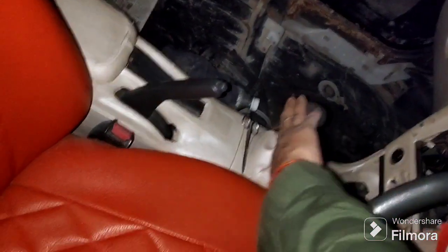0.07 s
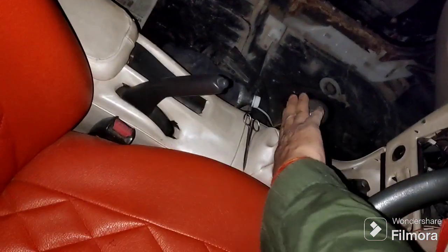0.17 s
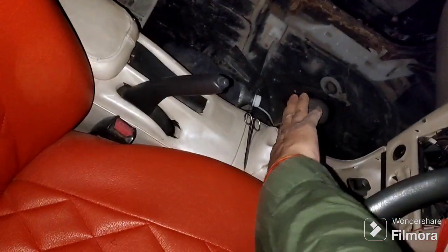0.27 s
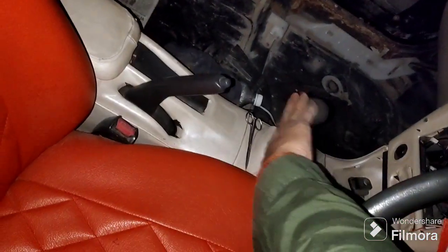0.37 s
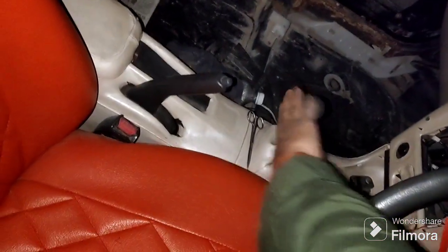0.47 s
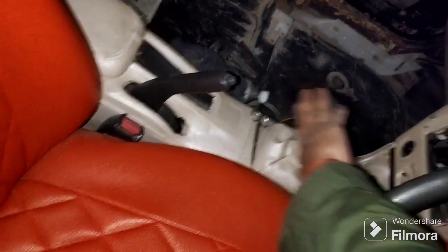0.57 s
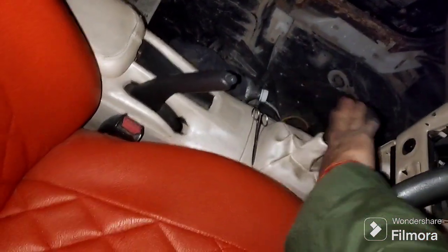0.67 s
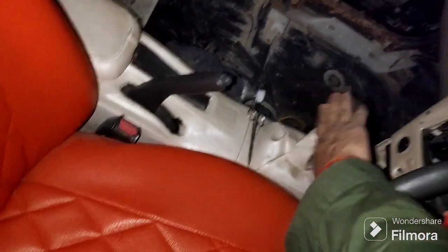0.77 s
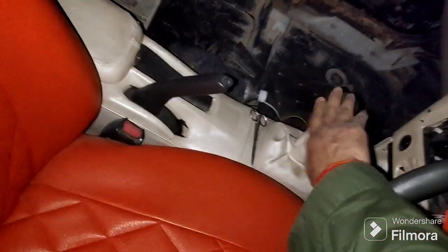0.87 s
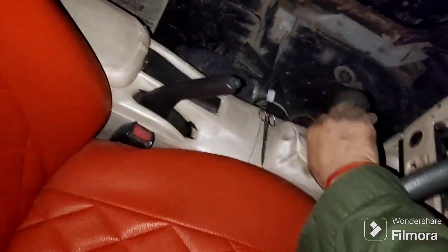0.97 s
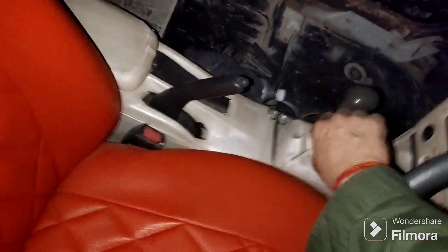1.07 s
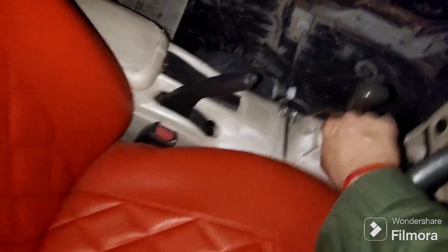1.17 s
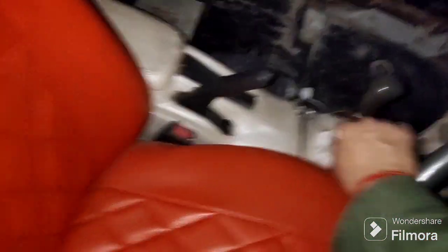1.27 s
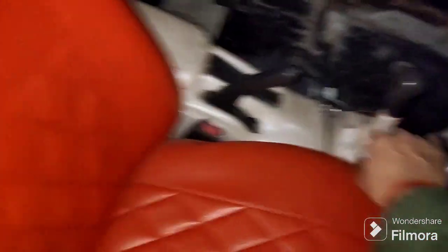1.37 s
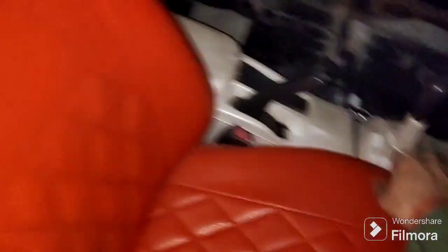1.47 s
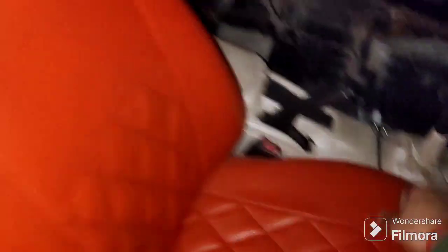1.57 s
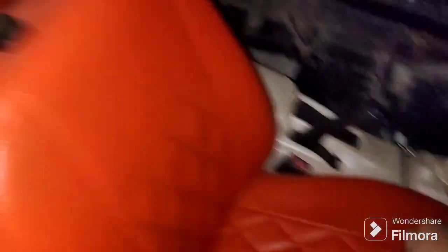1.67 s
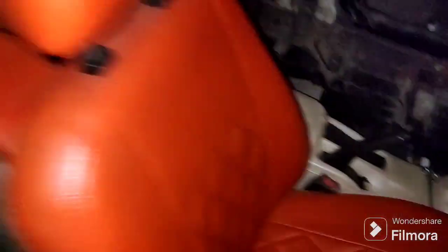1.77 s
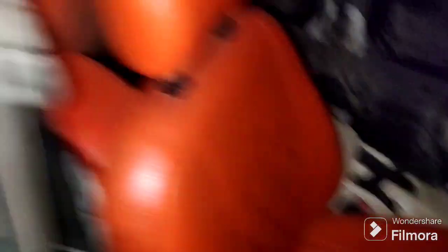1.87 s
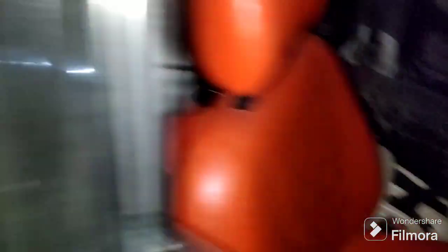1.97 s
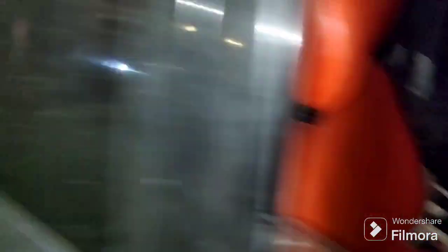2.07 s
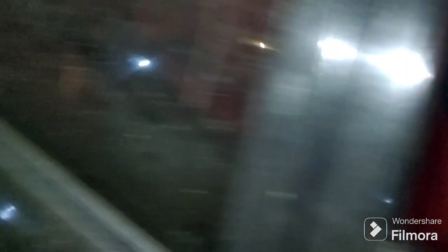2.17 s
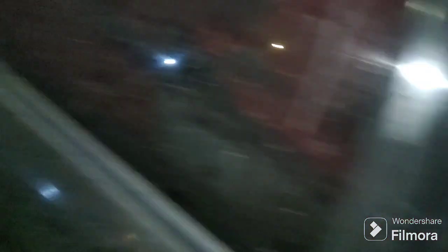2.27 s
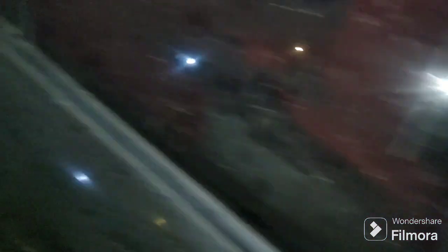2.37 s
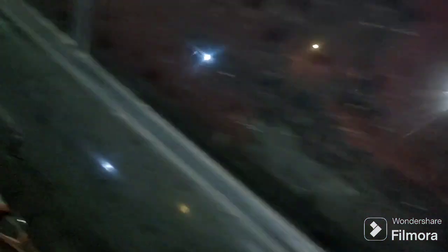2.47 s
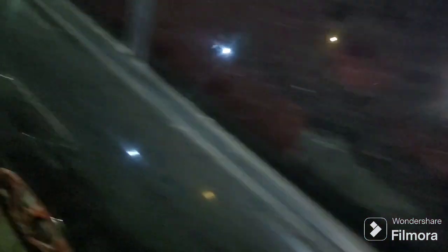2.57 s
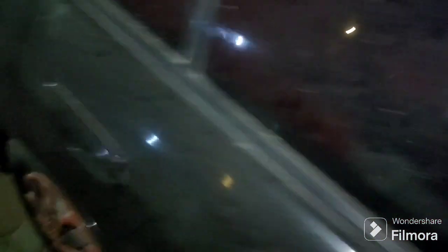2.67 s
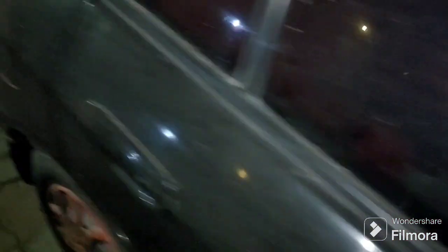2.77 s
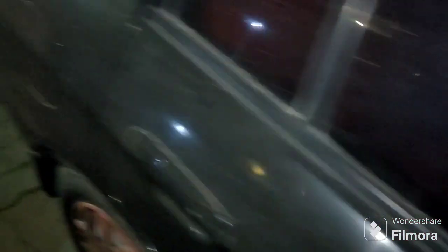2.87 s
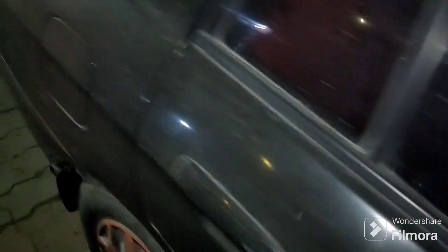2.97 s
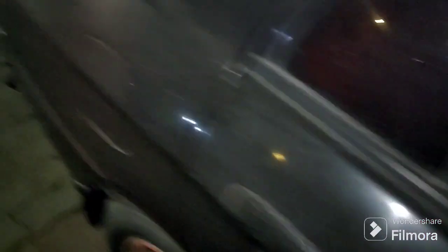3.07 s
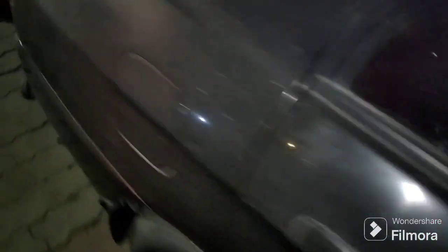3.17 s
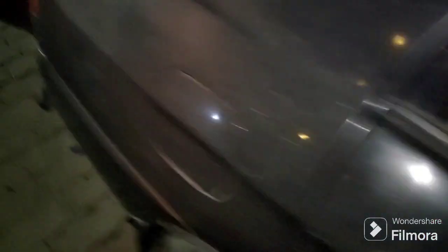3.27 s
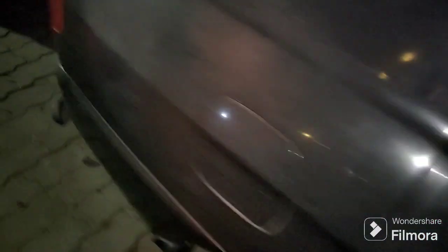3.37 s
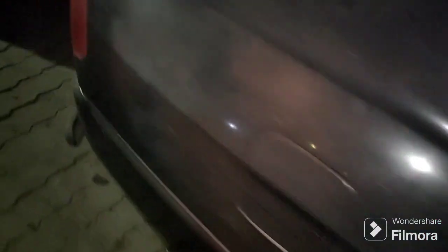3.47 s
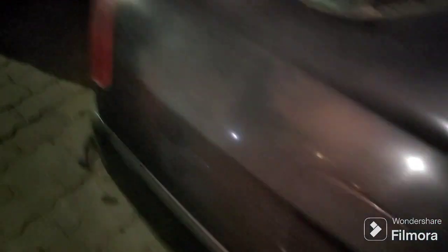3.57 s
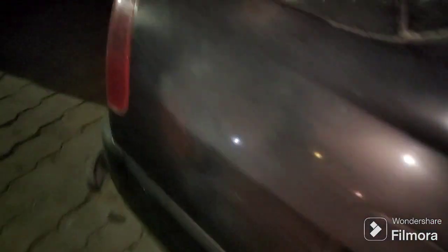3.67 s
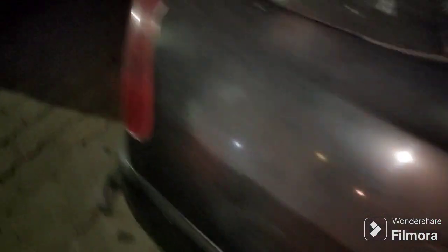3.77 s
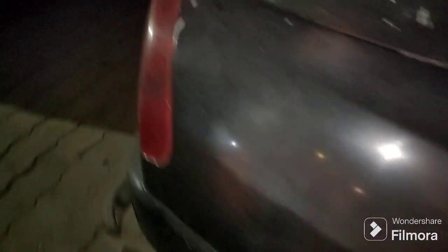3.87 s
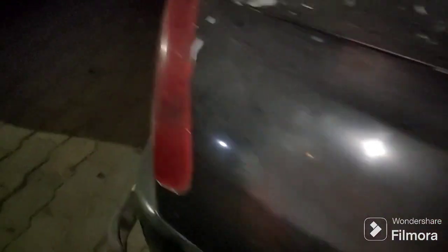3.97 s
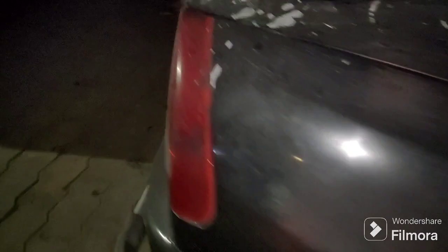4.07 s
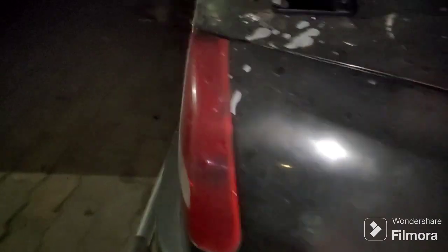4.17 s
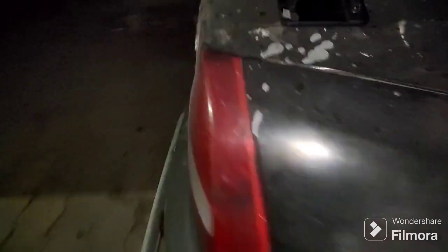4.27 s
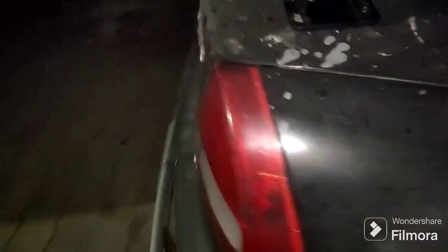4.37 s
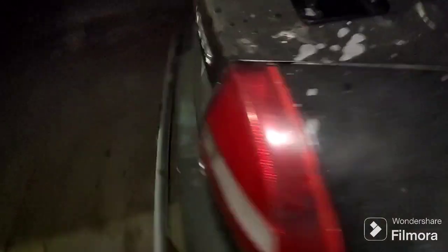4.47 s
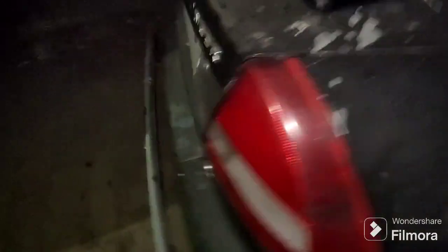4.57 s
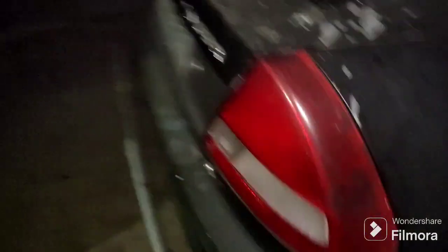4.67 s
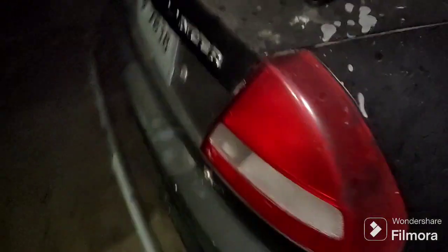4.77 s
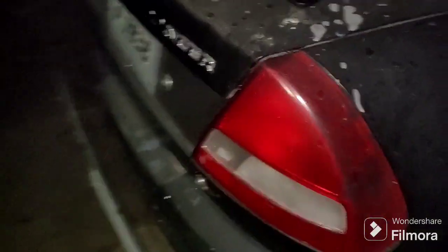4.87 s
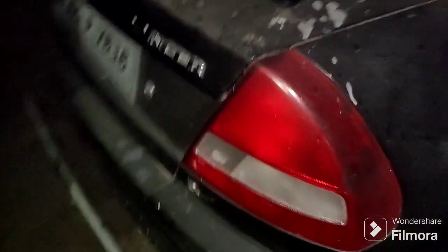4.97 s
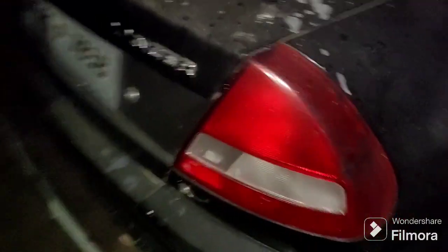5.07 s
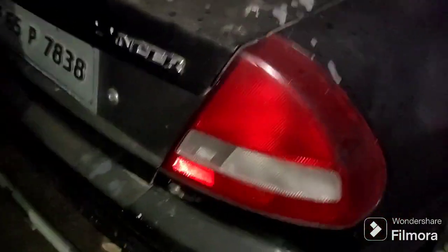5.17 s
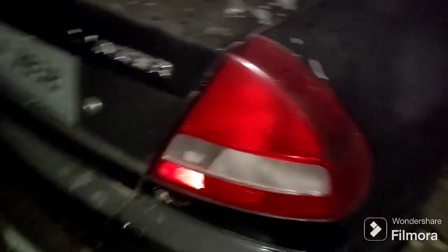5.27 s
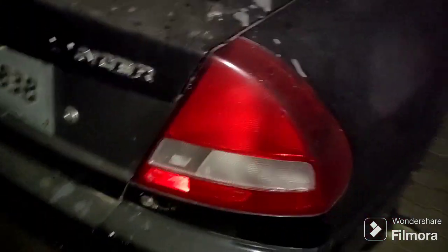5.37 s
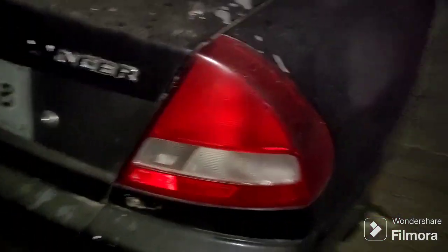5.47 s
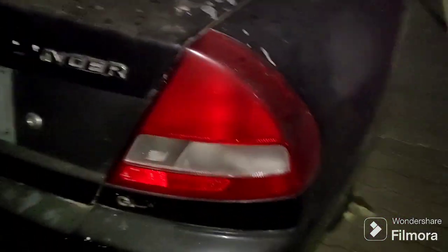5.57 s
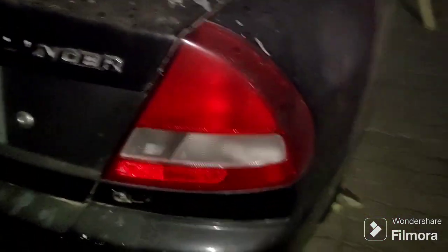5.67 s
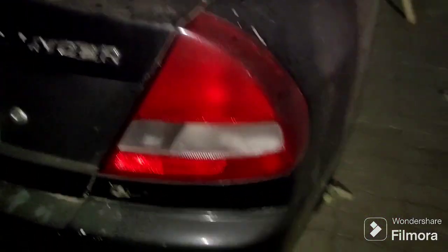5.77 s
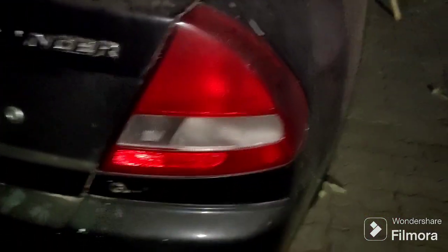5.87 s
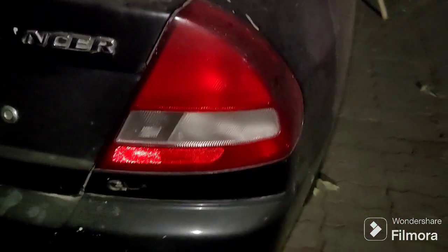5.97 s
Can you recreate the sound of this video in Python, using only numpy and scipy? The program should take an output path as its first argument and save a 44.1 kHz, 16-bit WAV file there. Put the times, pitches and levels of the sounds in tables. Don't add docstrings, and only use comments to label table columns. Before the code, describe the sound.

Soft lever thuds inside a hushed cabin open out to a bright latch click, gritty footsteps, cloth rustle and a faint droning, whining engine.

```python
import sys
import numpy as np
from scipy import signal
from scipy.fft import rfft, irfft, next_fast_len
from scipy.io import wavfile
from scipy.ndimage import uniform_filter1d

SR = 44100
rng = np.random.default_rng(int(sys.argv[2]) if len(sys.argv) > 2 else 0)


def field_ratio(decibels):
    return 10 ** (np.asarray(decibels, dtype=float) / 20)


def file_out(sig):
    cols = np.atleast_2d(sig).T
    lim = np.clip(cols, -1, 1)
    pcm = np.round(lim * 32767).astype(np.int16)
    wavfile.write(sys.argv[1], SR, pcm)


N = 265437

# time in seconds, peak in dB, console share in dB, ring t60 in seconds.
KNOCKS = [(0.002, -35.5, -14.5, 0.13), (0.62, -57, -20, 0.12), (0.645, -40.5, -42, 0.14),
          (0.664, -42.5, -53, 0.57), (0.771, -19.5, -12, 0.17), (0.789, -33, 5.5, 0.15),
          (0.808, -35, -2, 0.1), (0.842, -19, -5.5, 0.31), (0.882, -22.5, -16.5, 0.11),
          (0.942, -43, -7, 0.13), (0.982, -36, -12, 0.067), (1.03, -43.5, -14, 0.068),
          (1.1, -52.5, -29, 0.074), (1.654, -43, -11.5, 0.35), (1.68, -42, -20, 0.39),
          (1.761, -44, -43, 0.093), (0.44, -68, -25, 0.15)]
# frequency in Hz, level in dB, relative ring time.
CABIN_MODES = [(89, -1.5, 2.5), (114, -4.5, 1.6), (139.7, 1, 0.8), (161.3, -1.5, 1.0), (210, -3, 1.3)]
# frequency in Hz, level in dB, relative ring time.
CONSOLE_MODES = [(317.5, 4, 1), (468, -21, 0.46), (525, -0.5, 0.62), (679, -13, 1), (1024, -2, 0.21),
                 (1262, -3.5, 0.23), (1512, 0, 0.2)]
# time in seconds,
# peak, low share, top share and left minus right in dB.
TICKS = [(2.1847, -46, 1, -2, 3), (2.6554, -46.5, 0, -23, 1), (2.6783, -43, -3, -50, 0),
         (2.8747, -45.5, -5, -8.5, 8), (3.3447, -50, 12.5, -45, 17), (3.52, -40.5, -24, -11, 6),
         (3.5339, -38.5, 0, -9.5, 0.5), (3.8375, -35, -8, -16, 2), (4.0017, -46, 0, -13, 4),
         (4.119, -43.5, -4, -2.5, -2.5), (4.126, -38, 1, -12, 5), (4.6501, -49.5, 4, -22.5, -2),
         (4.7604, -42.5, 2, -7, 4), (5.226, -41, 0.5, -11, 6), (5.2421, -45, 0, -35, -11),
         (5.2578, -39.5, -10, -3, 1.5), (5.3657, -35.5, 3.5, -10.5, 2.5), (.196, -66, -6, -8, 0),
         (0.439, -73, -4, -2, 1), (5.1675, -40, -6, -7, -2), (5.268, -45, -12, -8, 0),
         (5.286, -46.5, -0.5, -8, 5), (4.04, -49, -6, -9, 2), (2.12, -56, -14, -4.5, -1),
         (3.855, -30, -13, -10, -1), (5.196, -48, -10, -8, 0), (4.713, -58.5, -10, 10, 2)]
# time in seconds, peak in dB, left minus right in dB.
SNAP = [
    (2.2112, -12, 7.5),
]
# frequency in Hz, level in dB, t60 in seconds.
LATCH_MODES = [(2406, -16.5, 0.078), (3450, -18, 0.085), (4430, -6.5, 0.0505), (4840, -1, 0.041),
               (6223, -2.5, 0.0566), (6730, -8, 0.053), (7250, -11.5, 0.097), (7600, -6.5, 0.082),
               (8856, -18.5, 0.1107), (9100, -22, 0.085), (9701, -15.5, 0.065), (10300, -11, 0.072),
               (10550, -11.5, 0.043), (11800, -11.5, 0.058)]
# frequency in Hz, level in dB per Hz.
LATCH_COLOUR = [(290, -58.5), (500, -24.5), (1060, -19.5), (2460, -11.5), (2810, -21), (3340, -10),
                (5470, -10), (6330, -1), (11000, -11.5), (12300, -8), (16000, -30.5)]
# frequency in Hz, left minus right in dB.
LATCH_LEAN = [(60, -13), (110, -5), (200, 2), (380, -7), (700, 19.5), (1290, -4), (2380, 8), (4400, 5.5),
              (8120, 9), (15000, -3)]
# time in seconds, peak, low share and top share in dB, rise in seconds.
SCUFFS = [
    (0.7784, -34.5, 4.5, -4, 0.0083),
    (0.8407, -43.5, 12, -18, 0.0021),
    (0.955, -50.5, 7.5, -8, 0.014),
    (3.4298, -43, 0, -8, 0.013),
    (3.838, -25, -9.5, -10, 0.018),
    (3.905, -32.5, -2, -8.5, 0.011),
    (4.5827, -48.5, 6.5, -8, 0.0057),
    (5.1188, -29.5, -0.5, -13, 0.022),
    (5.667, -38.5, -0.5, -8.5, 0.02),
    (5.9784, -43.5, 2, -11.5, 0.032),
]
# time of full force, swell and hold in seconds, level and top share in dB.
RUBS = [(0.879, .05, 0.11, -80.5, -18), (0.956, 0.06, 0.055, -75.5, 1.5), (1.301, 0.025, 0.07, -68.5, 6),
        (1.32, 0.22, 0.28, -84, 17.5), (1.716, .03, 0.059, -72, -2), (2.186, 0.15, 0.099, -61, -3),
        (2.277, 0.038, 0.089, -69.5, 1), (2.699, 0.11, 0, -76.5, 0), (2.76, 0.24, 0.042, -66, -1),
        (2.86, .04, 0.04, -70, -2.5), (3.364, 0.11, 0.084, -69.5, -6.5), (3.43, 0.22, 0.051, -67, -1),
        (3.573, .03, 0.046, -72.5, -5), (3.972, .06, 0.093, -63.5, -0.5), (4.108, 0.049, 0.15, -73.5, 3.5),
        (4.584, 0.0097, 0.049, -67, 2.5), (4.671, 0.05, 0.022, -60, 0), (4.81, .03, 0.013, -68.5, -8),
        (4.944, 0.33, 0.1, -83.5, 8), (5.19, 0.038, 0.017, -67.5, 4.5), (5.282, 0.091, 0.055, -59.5, -1),
        (5.416, 0.036, 0.013, -69.5, -2), (5.676, 0.0092, 0.04, -58.5, -3.5), (6.019, 0.017, 0, -69, 11)]
# frequency in Hz, level in dB per Hz.
RUB_TOP_COLOUR = [(7200, -31), (7600, 5), (8400, 8.5), (9300, 0), (10200, -3.5), (11200, -1), (12400, 1.5),
                  (13800, -11.5), (15400, -8.5)]
# time in seconds, peak in dB, resonance and width in Hz, t60 in seconds.
CREAKS = [(0, -66.5, 1590, 247, 0.33), (0, -73.5, 2740, 200, 0.28), (0.196, -68.5, 2580, 147.3, 0.092),
          (.197, -75, 3700, 200, 0.14), (0.199, -70, 5170, 840, 0.13), (.197, -74, 8160, 900, 0.11),
          (.197, -75, 12300, 1200, 0.1), (.27, -73.5, 7800, 900, 0.046), (.27, -77, 12300, 1500, 0.046),
          (.357, -77.5, 8340, 500, .12), (0.439, -67.5, 8600, 2610, 0.18), (.44, -87, 12300, 1533, 0.13),
          (0.639, -88, 1707, 200, 0.26), (1.281, -77, 1930, 300, 0.5), (1.281, -77.5, 2550, 247.3, .4),
          (0.945, -60.5, 1470, 500, 0.2), (1.048, -76.5, 8400, 503, 0.53), (1.8, -59, 504, 250, 0.36),
          (5.126, -46, 1800, 400, 0.05), (5.138, -38, 1630, 400, 0.063), (5.146, -39, 1800, 503, .04),
          (5.151, -41.5, 880, 400, 0.021), (4.651, -46.5, 2330, 600, 0.042),
          (4.761, -45.5, 1290, 300, 0.038), (3.345, -44.5, 1070, 450, 0.021),
          (4.001, -47, 1900, 348, 0.026), (5.258, -45, 7800, 900, .02), (4.127, -42.5, 1740, 300, .04),
          (4.58, -52, 720, 250, .04)]
# time in seconds, peak in dB, rise in seconds, t60 in seconds.
DOOR_JOLT = [
    (1.619, -19, 0.0091, 0.13),
]
# frequency in Hz, level in dB per Hz.
DOOR_COLOUR = [(180, -50), (300, -20.5), (562, -24), (720, -11), (1240, -20), (1620, -7.5), (2170, -10),
               (4070, -1), (5570, -10), (6050, -1.5), (8420, 1), (13800, -22), (15500, -36)]
# frequency in Hz, left minus right in dB.
DOOR_LEAN = [(60, -24), (110, -23.5), (200, -1), (380, 7.5), (700, 0), (1290, -8.5), (2380, -3.5),
             (4400, 2.5), (8120, -0.5), (15000, 13)]
# time in seconds, car body shade in dB, low over high panels in dB.
WAY_OUT = [(.3, -38, 4), (1.25, -38.5, 4), (1.33, -31.5, 8), (1.48, -35.5, 6), (1.66, -10.5, -7),
           (1.79, -13, 11), (1.94, -6.5, -12), (2.22, 0, 3.5), (2.58, -2, 5.5), (2.86, -0.5, -1),
           (3.17, -3, -0.5), (3.36, -2.5, 4), (3.49, -2, -6), (3.75, -1.5, -0.5), (4.4, -1.5, -4),
           (4.82, -1.5, 2), (5.05, -2.5, -7.5), (5.55, -3, 3.5)]
OPEN_AIR = {"bass": (-77, 0.5), "drone": (-61.5, 0.94), "hum": (-61.5, 0.86), "whine": (-55, 1.04),
            "insects": (-63, 0.83)}
# frequency in Hz, width in Hz.
PANEL_GROUPS = [
    [(170, 123), (215, 66), (255, 63)],
    [(310, 69), (370, 74), (425, 68), (475, 96)],
]
# frequency in Hz, level in dB per Hz.
WHINE_COLOUR = [(310, -41.5), (520, -10), (581, -6), (866, -1.5), (961, -8.5), (1490, -11.5), (1710, -2),
                (2480, -10.5), (2960, -10.5), (3500, -24.5), (4550, -28), (7700, -120)]
# frequency in Hz, width in Hz, level in dB.
WHINE_LINES = [(950, 240, -14), (1200, 110, -13), (1635, 27, -8.5), (1734, 36, -5.5), (1900, 160, -12),
               (2330, 60, -15)]
# frequency in Hz, level in dB per Hz.
BASS_COLOUR = [(13, -64.5), (22, -46), (45, -22), (100, 0), (140, -0.5), (180, -58), (310, -120)]
# time in seconds, level in dB.
HEELS = [
    (1.9, -67.5),
    (2.3, -61.5),
    (2.72, -59),
    (3.05, -62.5),
    (3.36, -60),
    (3.73, -73),
    (4.45, -69),
    (4.85, -67.5),
    (5.36, -69.5),
    (5.751, -65.5),
]
# time in seconds, echo lag in milliseconds, echo level in dB.
BODYWORK_ECHO = [(1.7, 1.8, 0), (1.85, 1.19, -7), (2.05, 1.07, -5.5), (2.3, 0.69, -22), (2.9, 0.68, -15),
                 (3.3, 1.75, -6.5), (3.8, 1.49, -17), (4.7, 0.97, -11.5), (5.1, 0.88, -7.5),
                 (5.45, 1.29, -6.5), (5.62, 0.8, -7.5), (5.7, 1.9, -1.5), (6, 1.99, -11)]
# time in seconds, level in dB, centre and width in Hz, swell in seconds.
SURGES = [(2.1, -62, 200, 120, .12), (2.2, -63.5, 380, 120, .12), (2.3, -59.5, 220, 80, .15),
          (2.45, -62.5, 171, 70, .1), (2.75, -60, 200, 110, 0.22), (2.8, -59.5, 460, 90, 0.29),
          (2.95, -61, 170.5, 80, 0.12), (3.1, -63.5, 419, 90, .15), (3.3, -61, 130, 70, .12),
          (3.5, -63.5, 339, 100, .15), (3.85, -63, 200, 90, .1), (4.1, -62, 399, 120, 0.17),
          (4.35, -61.5, 300, 120, 0.22), (4.75, -63, 260, 90, 0.11), (4.9, -62, 332, 110, .15),
          (5.2, -63.5, 373, 120, 0.16), (5.4, -61.5, 228, 120, 0.13), (5.7, -62.5, 300, 130, .15),
          (5.979, -64.5, 110, 60, 0.077)]
# frequency in Hz, level in dB per Hz.
INSECT_COLOUR = [(3470, -60), (5900, -30), (6080, -19), (6480, -5), (6780, 0), (7150, -1), (7640, -8),
                 (8120, -34), (8300, -40), (8860, -41), (9000, -55), (11700, -85), (19800, -120)]
# time in seconds, level in dB.
HEDGE_VIEW = [
    (1.3, -31),
    (1.6, -24),
    (1.72, -13.5),
    (2.0, -8.5),
    (2.3, -0.5),
    (3.5, -2),
    (5, -2.5),
    (6, 0),
]
# frequency in Hz, level in dB per Hz.
HISS_COLOUR = [(18, -28.5), (30, -3), (760, -18), (822, -20.5), (1320, -24.5), (1860, -34.5), (2410, -29.5),
               (16000, -30.5)]
# frequency in Hz, left-right correlation.
LIKENESS = [(60, 0.94), (300, 0.87), (600, 0.23), (1500, 0.026), (15000, 0.013)]

SECONDS = np.arange(N) / SR
PIECE = SR // 2
PIECE_SECONDS = np.arange(PIECE) / SR


def unit(x):
    return x / np.sqrt(np.mean(x ** 2))


def shaped(gain_db, count=N):
    size = next_fast_len(count)
    hz = np.maximum(np.fft.rfftfreq(size, 1 / SR), 1)
    like_hz, likeness = np.transpose(LIKENESS)
    like = np.clip(np.interp(np.log(hz), np.log(like_hz), likeness), -1, 1)
    mid, side = rfft(rng.standard_normal((2, size))) * field_ratio(gain_db(hz))
    mid = mid * np.sqrt(1 + like)
    side = side * np.sqrt(1 - like)
    return unit(irfft(np.array([mid + side, mid - side]), size)[:, :count])


def coloured(points):
    f, db = np.transpose(points)
    return shaped(lambda hz: np.interp(np.log(hz), np.log(f), db, -150, -150))


def peak(centre_hz, width_hz, count=N):
    return shaped(lambda hz: -30 * np.log10(1 + (2 * (hz - centre_hz) / width_hz) ** 2), count)


def band(lo_hz, hi_hz):
    return shaped(lambda hz: -10 * np.log10((1 + (lo_hz / hz) ** 24) * (1 + (hz / hi_hz) ** 32)))


def walk(rate):
    held = int(SR / rate)
    steps = np.repeat(rng.standard_normal(N // held + 1), held)
    return 1.3 * uniform_filter1d(uniform_filter1d(steps, held), held)[:N]


def curves(table):
    s, *columns = np.transpose(table)
    return [np.interp(SECONDS, s, column) for column in columns]


def add(out, s, piece):
    i = max(int(s * SR), 0)
    out[..., i:i + piece.shape[-1]] += piece[..., :N - i]


def ring(modes, t60, phases):
    total = np.zeros(PIECE)
    for (hz, db, relative), phase in zip(modes, phases):
        decay = field_ratio(db - 60 * PIECE_SECONDS / max(t60 * relative, 0.005))
        total += decay * np.sin(2 * np.pi * hz * PIECE_SECONDS + phase)
    return total


def rounded_rise(rise):
    return np.sin(np.pi / 2 * np.minimum(PIECE_SECONDS / rise, 1)) ** 2


def fade(rise, t60):
    return rounded_rise(rise) * field_ratio(-60 * np.maximum(PIECE_SECONDS - rise, 0) / np.clip(t60, 0.004, 0.4))


def swell(s, rise, fall, depth_db=20, hold=0):
    t = SECONDS - s
    return field_ratio(2 * np.where(t < 0, depth_db * t / rise, -fall * np.maximum(t - hold, 0)))


def sides(pan_db):
    return field_ratio(np.array([[pan_db], [-pan_db]]) / 2)


def lean(x, points):
    f, db = np.transpose(points)
    db = np.interp(np.log(np.fft.rfftfreq(x.shape[1], 1 / SR) + 1), np.log(f), db)
    return irfft(rfft(x) * field_ratio(np.array([db, -db]) / 2), x.shape[1])


def microphone_hiss():
    return field_ratio(-84) * coloured(HISS_COLOUR)


def insects():
    chorus = coloured(INSECT_COLOUR) * field_ratio(0.72 * walk(22))
    level_db = OPEN_AIR["insects"][0] + curves(HEDGE_VIEW)[0]
    return field_ratio(level_db) * unit(chorus)


def in_open(layer):
    db, share = OPEN_AIR[layer]
    return db + share * curves(WAY_OUT)[0]


def walked_off():
    return np.maximum(SECONDS - 4.3, 0)


def bass():
    heels = sum(field_ratio(2 * db) * swell(s, rise=0.31, fall=122) for s, db in HEELS)
    rumble = field_ratio(2 * (in_open("bass") - 7 * walked_off()))
    return np.sqrt(rumble + heels) * field_ratio(2.0 * walk(6.5)) * coloured(BASS_COLOUR)


def panels(group):
    fall_db = 3 * np.clip(SECONDS - 3.1, 0, 2)
    return unit(sum(field_ratio(3 * walk(7) - fall_db * (hz > 400)) * peak(hz, width) for hz, width in group))


def beside_panel(x):
    lag_ms, db = curves(BODYWORK_ECHO)
    lag = SR * np.maximum(lag_ms / 1000 + 0.00005 * walk(2), 2e-4)
    dull = uniform_filter1d(x, size=10)
    at = np.arange(N)
    echo = np.array([np.interp(at - lag, at, channel) for channel in dull])
    return x - field_ratio(db) * echo


def engine():
    tilt_db = curves(WAY_OUT)[1]
    drone, hum = (panels(group) for group in PANEL_GROUPS)
    lines = sum(field_ratio(db + 1.316 * walk(4.73)) * peak(hz, width) for hz, width, db in WHINE_LINES)
    whine = unit(coloured(WHINE_COLOUR) * field_ratio(0.9 * walk(16)) + lines)
    drone = field_ratio(in_open("drone") + tilt_db / 2) * drone
    hum = field_ratio(in_open("hum") - tilt_db / 2) * hum
    whine = field_ratio(in_open("whine") - 2.3 * walked_off() - 1.0) * whine
    return drone + beside_panel(hum + whine)


def surges():
    out, t = np.zeros((2, N + SR)), np.arange(SR) / SR - 0.5
    for s, db, hz, width, span in SURGES:
        i = int((s - 0.5) * SR)
        out[:, i:i + SR] += field_ratio(db - 20 * (t / span) ** 2) * peak(hz, width, count=SR)
    return out[:, :N]


def creaks():
    out = np.zeros((2, N))
    for s, db, hz, width, t60 in CREAKS:
        rise = 0.025 if s > 0.9 and t60 > 0.06 else 0.001
        add(out, s, field_ratio(db) * peak(hz, width, count=PIECE) * fade(rise, t60))
    return out


def contact(low_db, top_db):
    ripple_db = 2.5 * rng.standard_normal(128)
    corners = np.log([250, 800, 1300, 2200, 3200, 4700, 5900, 7200, 8600, 10000, 12200, 14600, 15800])
    low = [low_db - 13.5, low_db - 3.0, low_db, low_db + 3.0]
    top = [top_db + 0.5, top_db + 3.5, top_db - 4.0, -60]
    shape = low + [-3.5, -5.5, 1.5, 3, 0] + top

    def gain_db(hz):
        return np.interp(np.log(hz), corners, shape, -90) + np.interp(hz, np.arange(128) * 130, ripple_db)

    return shaped(gain_db, PIECE) * np.sqrt(1 + field_ratio(low_db) ** 2 + field_ratio(top_db) ** 2)


def ticks():
    out = np.zeros((2, N))
    for s, db, low_db, top_db, pan_db in TICKS:
        t60 = 0.018 * np.exp(0.1 * abs(pan_db))
        force = fade(0.002, t60) + field_ratio(-13) * fade(0.002, 0.16)
        add(out, s, field_ratio(db - 6.5) * sides(pan_db) * contact(low_db, top_db) * force)
    return out


def grind(rise):
    late = np.maximum(PIECE_SECONDS - rise * (1 + 0.57), 0)
    return rounded_rise(rise) * (field_ratio(-60 * late / 0.12) + field_ratio(-11.5 - 60 * late / 0.36))


def scuffs():
    out = np.zeros((2, N))
    for s, db, low_db, top_db, rise in SCUFFS:
        add(out, s, field_ratio(db - 15.5) * contact(low_db, top_db) * grind(rise))
    return out


def rubbing():
    mid, top, sheen = 0, 0, 0
    tail = field_ratio(2 * -9)
    for s, rise, hold, db, top_db in RUBS:
        def stroke(fall):
            return swell(s, rise, fall, depth_db=24.5, hold=hold)

        drop = stroke(247)
        mid = mid + field_ratio(2 * db) * (drop + tail * stroke(84.5))
        top = top + field_ratio(2 * (db + top_db)) * (drop + tail * stroke(111))
        sheen = sheen + field_ratio(2 * (db + top_db - 15.5)) * stroke(67.5)
    mid_noise = np.sqrt(mid) * field_ratio(2.1 * walk(30)) * band(lo_hz=2890, hi_hz=7220)
    top_noise = np.sqrt(top) * field_ratio(2.0 * walk(30)) * coloured(RUB_TOP_COLOUR)
    return mid_noise + top_noise + np.sqrt(sheen) * peak(12300, 2600)


def friction():
    grit = unit(field_ratio(1.7 * walk(400)))
    return (scuffs() + rubbing()) * grit


def door():
    out, (s, db, rise, t60) = np.zeros((2, N)), DOOR_JOLT[0]
    rough = coloured(DOOR_COLOUR) * field_ratio(1.0 * walk(500))
    add(out, s - 0.002, field_ratio(db - 8.0) * rough[:, :PIECE] * fade(rise, t60))
    return lean(out, DOOR_LEAN)


def latch():
    out, (s, db, _) = np.zeros((2, N)), SNAP[0]
    phases = rng.uniform(0, 2 * np.pi, (2, len(LATCH_MODES)))
    metal = np.array([ring(LATCH_MODES, 1.0, p) for p in phases]) * fade(0.00071, 0.22)
    burst = field_ratio(-1.0) * fade(0.00083, 0.019) + field_ratio(-13) * fade(0.0017, 0.12)
    crack = coloured(LATCH_COLOUR)[:, :PIECE] * burst
    add(out, s, field_ratio(db) * (field_ratio(-2.5) * metal / np.abs(metal).max() + field_ratio(-6.5) * crack))
    return lean(out, LATCH_LEAN)


def floor_shudder():
    power = sum(field_ratio(2 * db) * swell(s, rise=0.015, fall=125) for s, db, *_ in KNOCKS)
    return np.sqrt(power) * field_ratio(-16 + 2.0 * walk(22)) * band(lo_hz=70, hi_hz=200)


def lever():
    out = np.zeros((2, N))
    rattle = band(lo_hz=260, hi_hz=706) + field_ratio(-8.5) * peak(1200, 1300)
    build = 0.008
    crest = np.pi / 2 - 2 * np.pi * np.array(CABIN_MODES)[:, 0] * build
    for s, db, console_db, t60 in KNOCKS:
        way = -1 if 0.83 < s < 0.86 else 1
        air = ring(CABIN_MODES, t60, crest + rng.normal(0, 0.58, len(CABIN_MODES)))
        boom = way * air * (fade(build, 0.29) + field_ratio(-9.5) * fade(build, 0.53))
        left = rng.normal(0, 2.3, len(CONSOLE_MODES))
        right = left + rng.normal(0, 0.4, len(CONSOLE_MODES))
        console = np.array([ring(CONSOLE_MODES, t60, p) for p in (left, right)]) * fade(0.0049, 0.4)
        loose = np.roll(rattle, -int(s * SR), axis=1)[:, :PIECE] * fade(0.0019, 0.26)
        console = console / np.abs(console).max() + field_ratio(-16.5) * loose
        add(out, s - 0.0025, field_ratio(db - 1.0) * boom / np.abs(boom).max() * sides(0.91))
        add(out, s - 0.002, field_ratio(db + console_db - 2.5) * console)
    out = signal.sosfiltfilt(signal.butter(2, 60, "high", fs=SR, output="sos"), out)
    return out + floor_shudder()


def scene():
    far = microphone_hiss() + insects() + bass() + engine() + surges()
    near = creaks() + ticks() + friction() + door() + latch()
    return far + near + lever()


def top_cut(x):
    return signal.sosfilt(signal.butter(12, 15900, fs=SR, output="sos"), x)


def record(dry):
    return top_cut(dry)


dry = scene()
out = record(dry)
file_out(out)
```